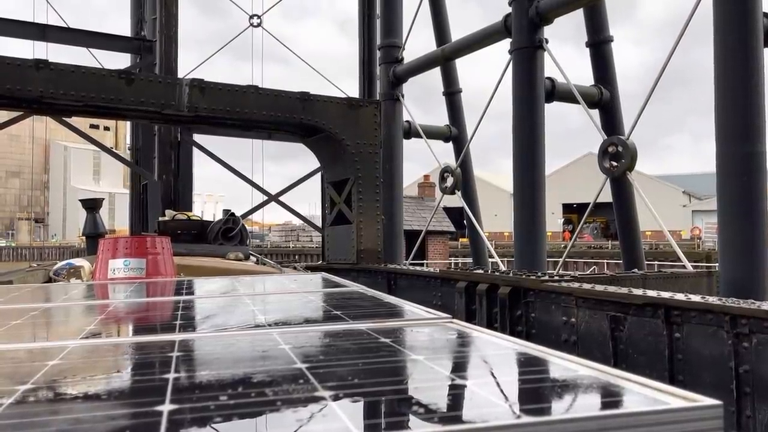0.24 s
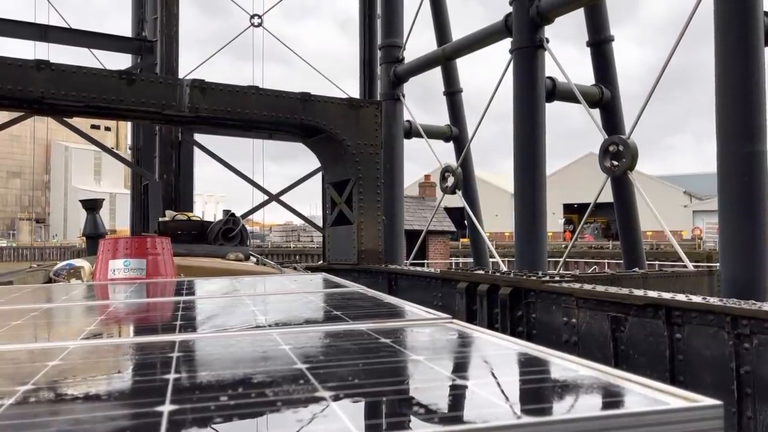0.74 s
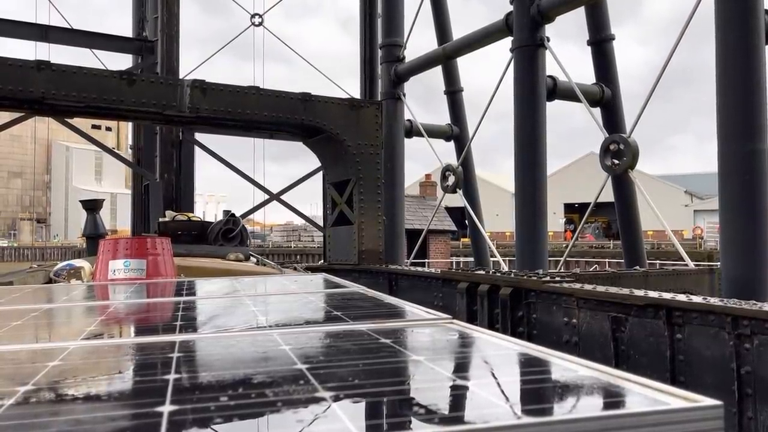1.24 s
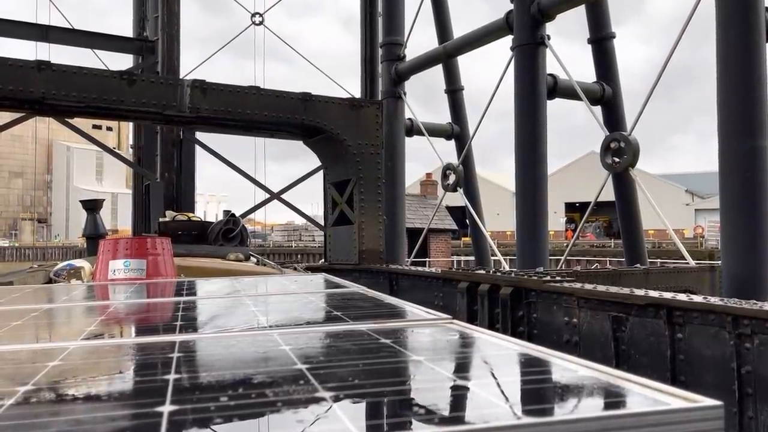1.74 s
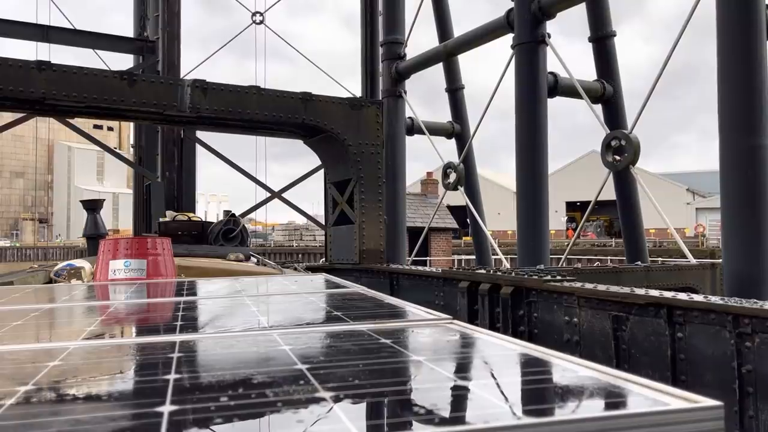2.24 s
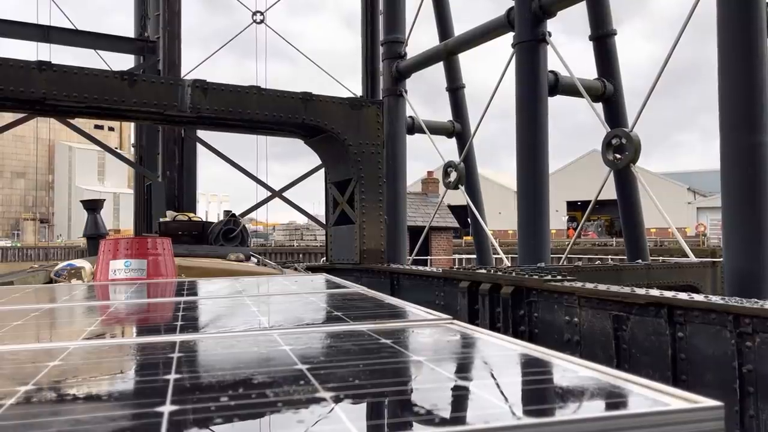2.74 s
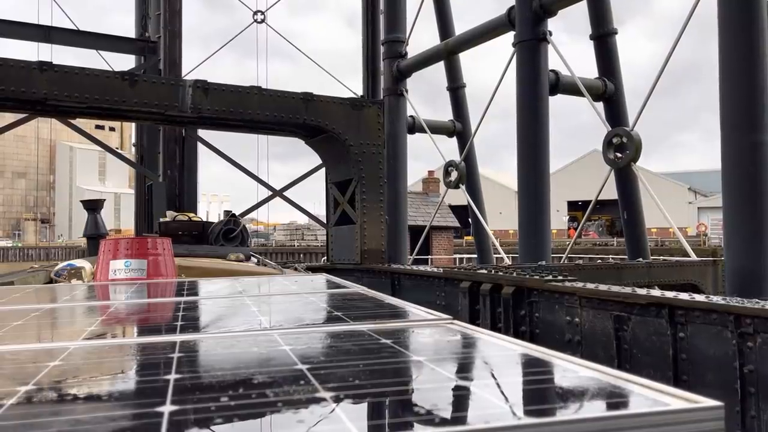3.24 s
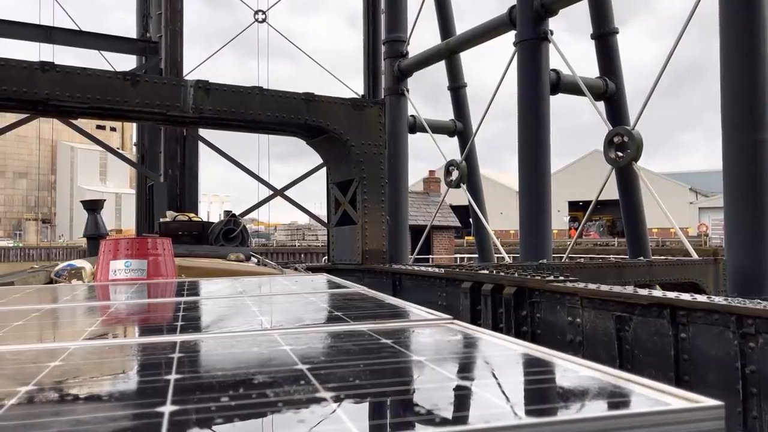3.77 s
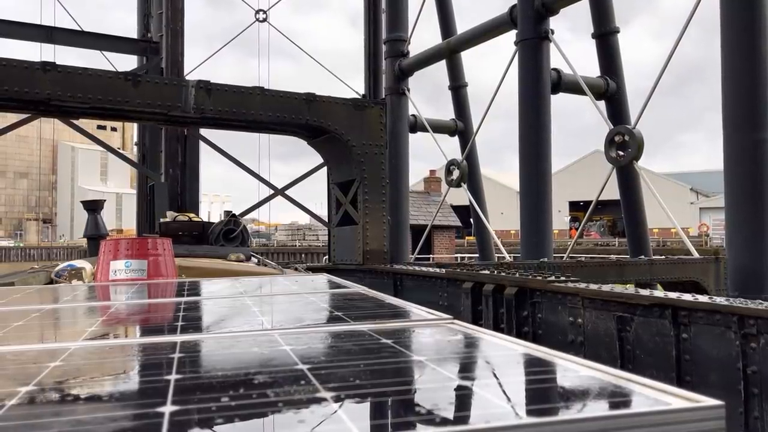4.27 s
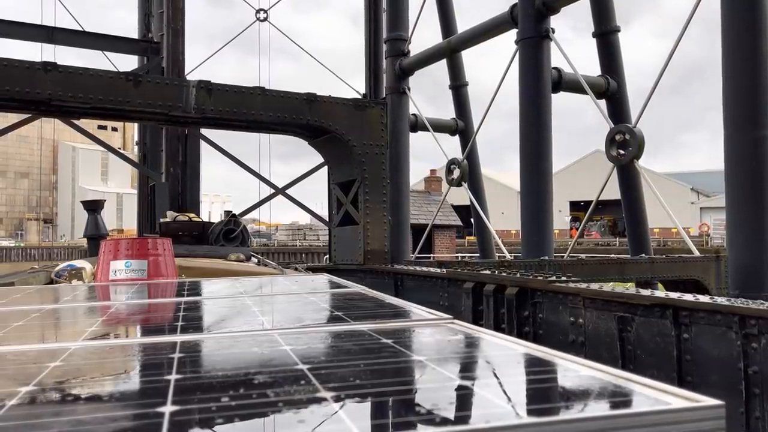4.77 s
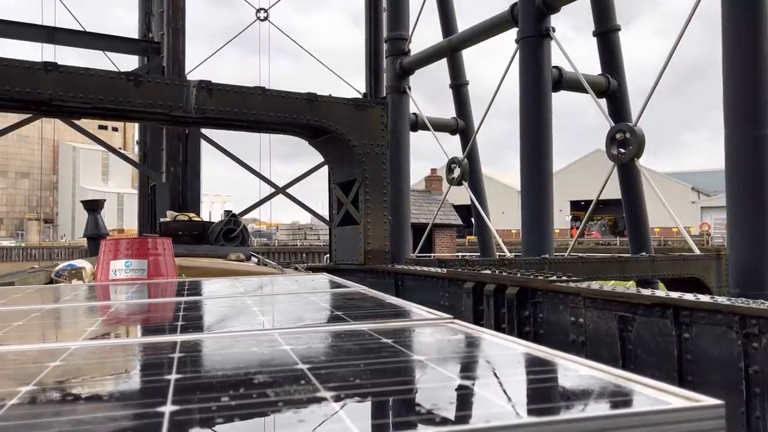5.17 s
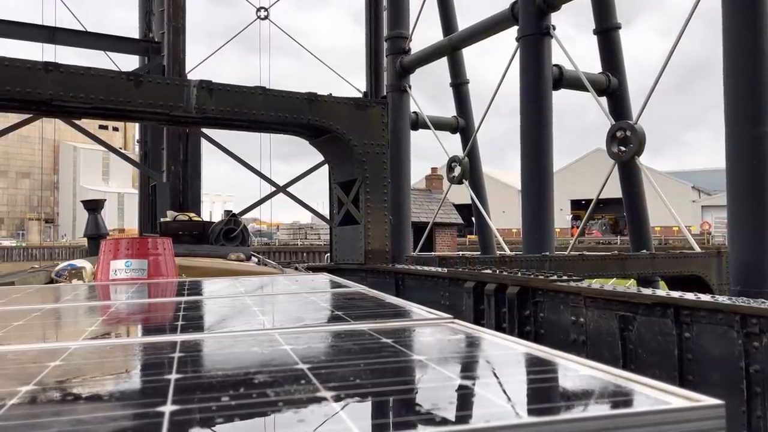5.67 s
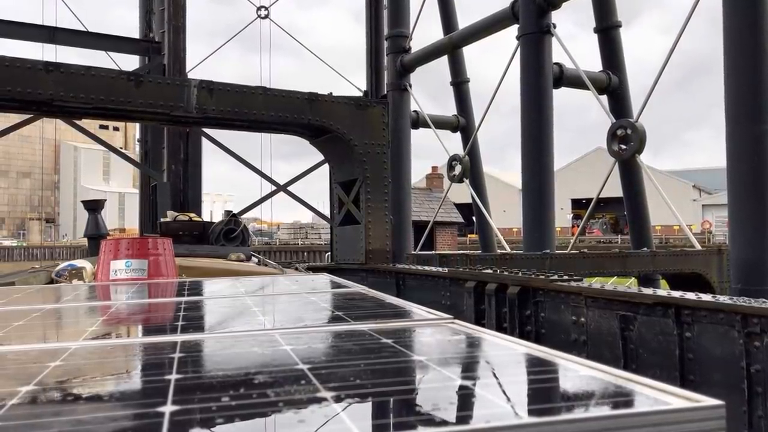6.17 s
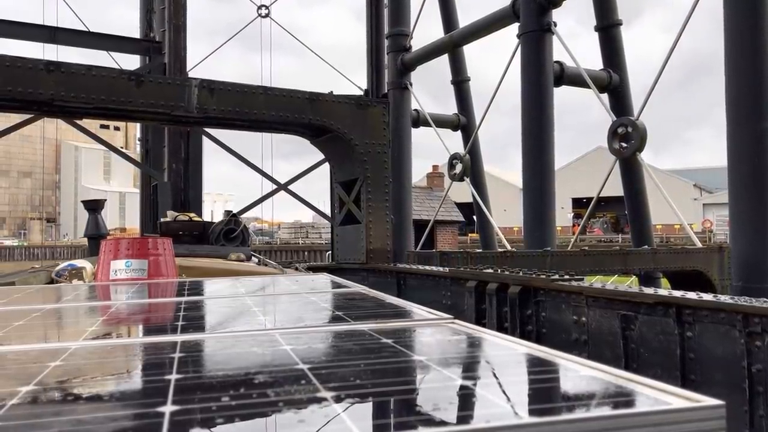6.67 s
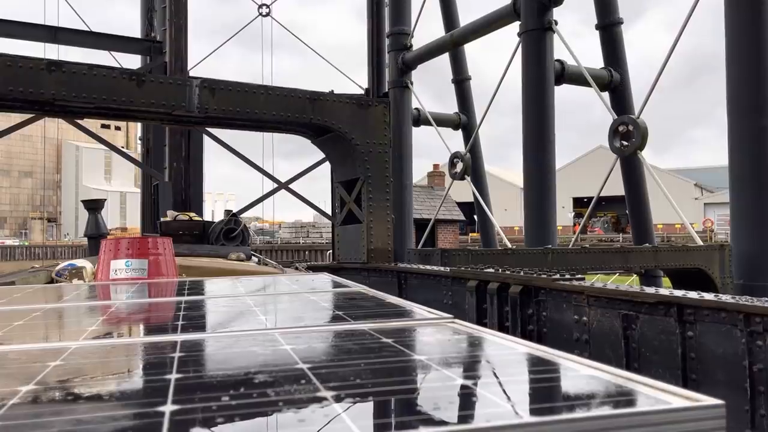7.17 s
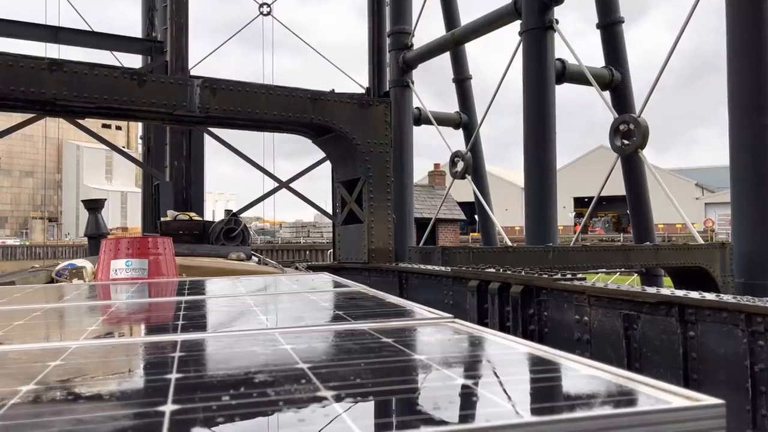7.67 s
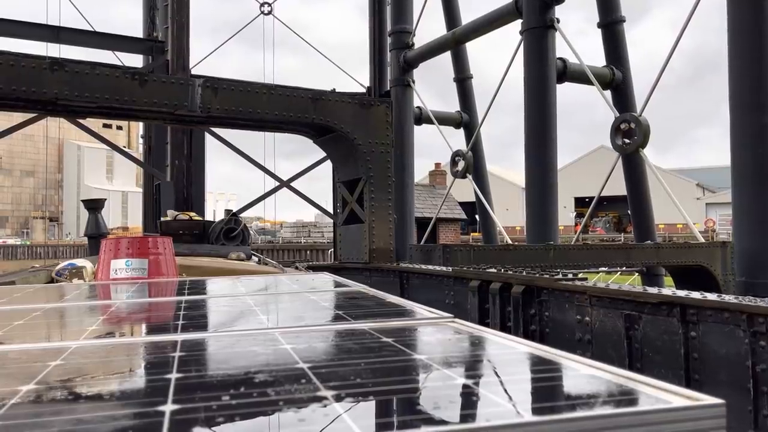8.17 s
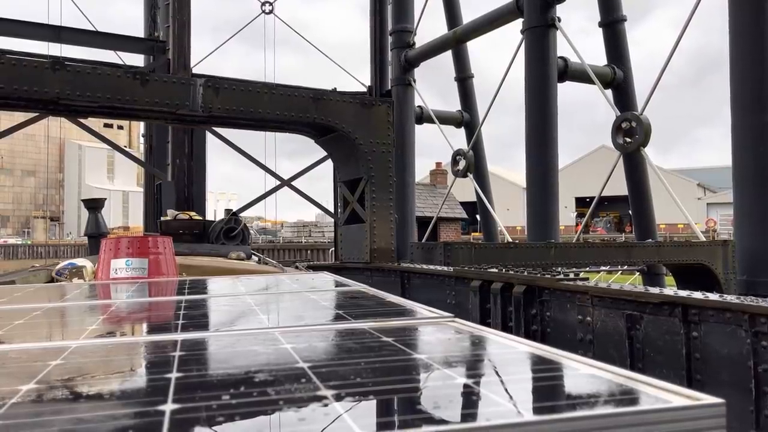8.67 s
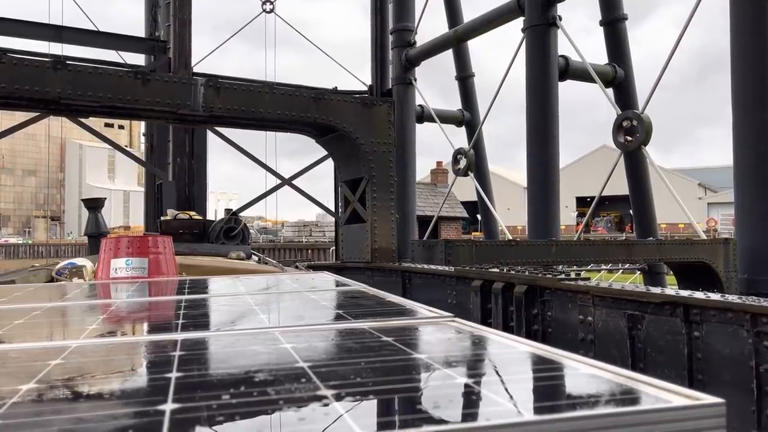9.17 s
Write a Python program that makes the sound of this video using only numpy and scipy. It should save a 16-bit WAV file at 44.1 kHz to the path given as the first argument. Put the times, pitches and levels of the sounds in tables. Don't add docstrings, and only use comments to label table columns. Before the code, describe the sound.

Outdoors at a large steel boat lift, heard through an exposed stereo phone microphone. Throughout, a drive holds one low pitch near 223 Hz, smooth and unwavering; its overtones swell and fade separately, drifting left and right as steelwork echoes pass. A continuous distant works roar, with soft hiss and faint airy top, sits behind. Wind puffs hit the microphone at 0 and 0.4 seconds, then a small popping flurry comes near 1.8. Low gusts thump around 2.1-2.8 and 3.8, with softer buffeting from 4.5 to 5.1. Stronger bumps arrive at 5.6 and 6.2. From 6.8 to 7.7 the hardest gusts burst in dense thuds, flutters and sharp pops. Faint, high bird chirps come from far left between 6.5 and 7.5, with one more near 8.4. The wind drops after 7.7, returning lightly around 9, while hum and roar continue to the end without a finish.

```python
import sys
import numpy as np
from scipy import signal
from scipy.fft import rfft, irfft, next_fast_len
from scipy.io import wavfile
from scipy.ndimage import uniform_filter1d

SR = 44100
rng = np.random.default_rng(int(sys.argv[2]) if len(sys.argv) > 2 else 0)


def convert_level_to_amplitude(level_db):
    exponent = np.asarray(level_db, float) / 20
    return 10 ** exponent


def wav_out(sig):
    wavfile.write(sys.argv[1], SR, np.round(np.clip(np.atleast_2d(sig).T, -1, 1) * 32767).astype(np.int16))


N = 415422
TIME = np.arange(N) / SR
SPAN = next_fast_len(N)
BINS_HZ = np.maximum(np.arange(SPAN // 2 + 1) * SR / SPAN, 1)

# pitch in Hz, level in dB per Hz, left minus
# right in dB, likeness of the ports 0-1, left lead in rad.
WORKS_COLOUR = [(60, -15, -6, .8, -6), (130, 2.5, -15, 0.7, 2.5), (252, 19.5, 2, 0.68, -1.4), (320, 14, 4, 0.5, -1),
                (430, 9, -4.5, 0.67, -0.5), (540, 7, -1.5, 0.13, 0), (640, 7.5, 1, 0.02, 0.74),
                (850, 6, -1.5, 0.39, -0.1), (1046, 4.5, 2, 0.35, 2.24), (1242, 5, 4, 0.6, -2),
                (1427, -1.5, -2, 0.25, -3), (2230, -4, 0, 0.25, 1.66), (2660, -6.5, 2.5, 1, 0.6),
                (2890, -7, 1.5, 0.35, 2),
                (3600, -10, 1.6, .52, .55), (4400, -13, 1.7, .5, .55), (5200, -13.2, 2.5, .25, .5),
        (5900, -13.2, 2.5, .57, .3), (6500, -15, 3, .55, .15), (7050, -14.7, 4.8, .52, .3),
        (7500, -13.3, 2.6, .7, .9), (8150, -12.2, 1, .86, .4),
                (8350, -12.2, 0, .998, 0), (8850, -12.6, 0, .998, -.04), (9050, -12, 0, .9, -.9),
       (9650, -12, 0, .9, -2.4), (9950, -12, 0, .996, -3.06), (10400, -12, 0, .999, -3.16),
       (10550, -11.8, 0, .88, -3.7), (11200, -16, 0, .8, -5.1), (11420, -19.5, 0, .995, -6.2),
       (11680, -25, 0, 1, -6.28), (12150, -33, 0, 1, -6.28), (12300, -110, 0, 1, -6.28)]

# start in seconds, length in seconds, start in Hz, end in Hz, level in dB.
CHIRPS = [(6.53, 0.052, 7200, 7100, -57), (6.58, .045, 7000, 6850, -55), (6.695, .06, 5400, 5270, -57),
          (6.765, .035, 5350, 5350, -56), (6.85, .035, 5350, 5300, -58), (7.01, .04, 7000, 7000, -58),
          (7.12, .035, 5100, 6100, -57), (7.285, .025, 5500, 5970, -53), (7.334, .025, 5800, 5600, -55),
          (7.47, .03, 5500, 5930, -60), (8.39, .06, 6150, 6100, -58)]

# pitch in Hz, level in dB per Hz.
THUD = [(18, -40), (30, -23), (42, -11.5), (60, -5.5), (85, -1.5), (120, -14), (300, -70), (2000, -130)]
RUMBLE = [(45, -62), (85, 1), (120, 2.5), (180, 1.5), (240, -2.5), (330, -29), (900, -86), (3000, -130)]
FLUTTER = [(120, -22), (200, 0.5), (330, -5), (450, -11), (620, -12), (900, -54), (2500, -90), (5000, -130)]
# colour, evened over seconds, likeness of the ports 0-1,
# tilt in dB per dB of brightness, gust level in dB, breeze level in dB, lumps in dB.
EDDIES = [
    (THUD, 0.07, 0.85, -0.55, -3.5, -3, 2.5),
    (RUMBLE, 0.05, 0.82, 0.45, -3.5, -1.5, 2.2),
    (FLUTTER, 0.05, 0.6, 0.3, -15, -9, 2.5),
]
# time in seconds, level in dB, brightness in dB.
BREEZE = [(0.0, -37, 2), (0.45, -37.5, 3), (0.75, -33, 4), (1.15, -38, 8.5), (1.7, -35.5, 9),
          (2.2, -33.5, 0.5), (4.1, -32.5, -1), (4.35, -35.5, 0), (5.4, -34.5, 2), (5.85, -36, 8),
          (6.35, -30.5, -6), (6.7, -32.5, -4), (6.95, -31.5, -1), (7.6, -26.5, 2.5), (7.8, -36.5, 5),
          (8.5, -38, 2), (8.9, -33, -7), (9.42, -33.5, 5)]
# peak in seconds, reach in seconds, peak level in dB, brightness in dB.
GUSTS = [(0.01, 0.069, -25.5, 6), (0.354, 0.042, -27.5, 9), (0.918, 0.026, -34, -6),
         (2.105, 0.069, -31.5, 3.2), (2.24, 0.027, -29, -1), (2.544, 0.045, -32, -3),
         (2.83, 0.065, -24, -5), (3.208, 0.043, -29, 1), (3.687, 0.03, -30, -5), (3.816, 0.041, -24, -7),
         (3.97, 0.075, -34, -7), (4.56, 0.19, -32, 2), (4.8, 0.077, -31, -8), (4.934, 0.054, -30, -15),
         (5.133, 0.045, -30, -8), (5.373, 0.037, -34, -9), (5.592, 0.11, -23, 2.5), (5.69, 0.022, -28, 11),
         (6.181, 0.021, -25, 9), (6.276, 0.043, -24.1, 5), (6.366, 0.033, -29, -4), (6.87, 0.042, -17, 2.5),
         (6.97, .03, -23, -5), (7.05, 0.057, -16, 2), (7.159, 0.024, -19, -5), (7.34, 0.072, -23, -5),
         (7.46, 0.036, -18.5, -1), (7.658, 0.035, -27, 3), (8.95, 0.18, -33, 1), (9.224, 0.038, -31, -6)]

# time
# in seconds, peak in dB, pitch in Hz.
POPS = [(0.02, -14.5, 278), (0.363, -20.5, 270), (1.739, -19, 217), (1.814, -13.5, 320), (1.874, -19, 268),
        (2.105, -19.5, 218), (5.491, -21, 216), (5.591, -12.5, 218), (5.611, -17, 248), (5.661, -16, 244),
        (5.696, -13.5, 243), (6.179, -15, 195), (6.268, -16.5, 218), (6.812, -7, 320), (6.848, -14, 220),
        (6.868, -10.5, 200), (6.894, -20, 219), (7.031, -11, 215), (7.059, -10, 250), (7.158, -15, 160),
        (7.328, -10.5, 234), (7.404, -9.5, 320), (7.426, -11.5, 463), (7.465, -13, 220), (7.516, -15, 200),
        (7.541, -12, 356), (7.565, -18, 248), (7.588, -12, 217), (7.644, -12, 280), (7.662, -12, 211),
        (.004, -13.5, 204), (1.81, -30, 480), (5.559, -26, 600), (5.589, -21, 640), (5.68, -26, 450),
         (6.267, -22, 540), (6.8093, -17, 520), (6.829, -17, 90), (6.955, -17, 100), (7.094, -14.5, 90),
         (7.399, -22, 520), (7.483, -22, 130), (7.643, -18, 640)]

# nearest in seconds, reach in seconds, left in dB, right in dB, left lead in rad.
FIRST = [
    (0, 3.7, -29, -27, -1.58),
    (4.2, 2.67, -33, -28.5, -1.86),
    (9.4, 3.14, -25.5, -30.5, -2.5),
]
SECOND = [
    (1.3, 2.0, -52.6, -58.0, -0.3),
    (3.7, 2.0, -46.1, -49.0, 2.8),
    (4.25, 0.36, -56.8, -45.8, 0.2),
    (6.28, 2.0, -44.7, -37.0, 2.4),
    (7.4, 0.53, -42.9, -59.3, -0.6),
    (9.32, 1.48, -46.1, -40.9, 0.6),
]
FOURTH = [
    (0.27, 0.59, -47.0, -52.2, -3.2),
    (1.14, 0.6, -46.5, -51.8, -1.1),
    (2.1, 0.59, -46.9, -48.9, 3.0),
    (3.5, 0.82, -51.7, -43.9, -2.3),
    (4.32, 0.29, -52.0, -56.8, -3.4),
    (4.76, 0.85, -59.5, -45.1, -2.0),
    (6.9, 1.7, -55.8, -60.3, 1.1),
    (8.27, 2.0, -74.0, -52.4, 5.2),
    (9.79, 0.82, -49.9, -46.5, 2.6),
]
FIFTH = [
    (0.16, 0.38, -47.3, -52.3, -0.5),
    (0.63, 0.32, -71.7, -51.2, -1.3),
    (1.63, 0.58, -46.7, -43.4, 0.5),
    (3.0, 0.6, -46.1, -53.1, 0.9),
    (3.29, 0.59, -45.3, -55.0, -4.6),
    (4.93, 0.59, -44.0, -45.3, -0.8),
    (5.71, 0.47, -46.1, -52.8, -0.9),
    (6.41, 0.58, -46.0, -50.6, 3.3),
    (7.83, 0.68, -53.0, -46.5, -0.9),
    (9.28, 0.59, -45.2, -51.0, 1.7),
]
# multiple of the drive pitch, level in dB, swell in seconds, reach in seconds, swell in dB.
FAINT = [
    (3, -58, 0, 1.5, 6),
    (6, -64, 9.2, 3, 5),
    (7, -64.5, 3.2, 1.2, 6),
    (8, -62, 7.2, 2, 6),
    (9, -71, 7.8, 2.5, 6),
]

DRIVE_HZ = 222.88
WHINE_HZ, WHINE_DB = 2522, -65
WORKS_DB = -37.5
LEFT_LATE_S = 0.00041
SMALL_POPS, SMALL_POP_DB, SMALL_POP_HZ = 120, 1, 257
BIRD_PAN_DB, BIRD_LEAD_RAD = 6, 1.4


def walk(rate):
    hold, count = int(1000 / rate), int(TIME[-1] * 1000) + 2
    steps = np.repeat(rng.standard_normal(count // hold + 1), hold)
    coarse = uniform_filter1d(uniform_filter1d(steps, hold), hold)[:count]
    return 1.3 * np.interp(TIME, np.arange(count) / 1000, coarse)


def over_time(table):
    s, *columns = np.transpose(table)
    return [np.interp(TIME, s, c) for c in columns]


def over_pitch(table):
    hz, *columns = np.transpose(table)
    return [np.interp(np.log(BINS_HZ), np.log(hz), c) for c in columns]


def hump(s, reach):
    return np.exp(-((TIME[::88, None] - s) / reach) ** 2)


def fine(coarse):
    return np.interp(TIME, TIME[::88], coarse)


def ports(x, db, pan_db, like, lead):
    shared, own = rfft(x, SPAN)
    like = np.clip(like, 0, 1)
    both = np.sqrt((1 + like) / 2) * shared
    apart = np.sqrt((1 - like) / 2) * own
    left = (both + apart) * convert_level_to_amplitude(db + pan_db / 2) * np.exp(0.5j * lead)
    right = (both - apart) * convert_level_to_amplitude(db - pan_db / 2) * np.exp(-0.5j * lead)
    out = irfft([left, right], SPAN)[:, :N]
    return out / np.sqrt(np.mean(out ** 2))


def works():
    noise = ports(rng.standard_normal((2, N)), *over_pitch(WORKS_COLOUR))
    spectrum, out = rfft(noise, SPAN), 0
    octave = np.log2(BINS_HZ / 100)
    for k in range(7):
        place = np.clip(octave, 0, 6) - k
        share = np.cos(np.pi / 2 * np.clip(place, -1, 1)) ** 2
        wander = convert_level_to_amplitude(0.21 * walk(0.74) + 0.97 * walk(5))
        out = out + irfft(spectrum * share, SPAN)[:, :N] * wander
    return convert_level_to_amplitude(WORKS_DB) * out


def bird():
    out = np.zeros((2, N))
    lead = np.array([[BIRD_LEAD_RAD], [0]])
    pan_db = np.array([[BIRD_PAN_DB], [-BIRD_PAN_DB]]) / 2
    for s, length, from_hz, to_hz, db in CHIRPS:
        n, at = int(length * SR), int(s * SR)
        warble = 40 * uniform_filter1d(rng.standard_normal(n), size=8)
        hz = np.linspace(from_hz, to_hz, n) + warble
        note = np.sin(2 * np.pi * np.cumsum(hz) / SR + lead) * np.hanning(n) ** 0.5
        out[:, at:at + n] += note * convert_level_to_amplitude(db + pan_db)
    return out


def blowing(tilt, gust_db, breeze_db):
    s, reach, db, bright_db = np.transpose(GUSTS)
    gusts = fine(hump(s, reach) ** 2 @ convert_level_to_amplitude(db + gust_db + tilt * bright_db) ** 2)
    db, bright_db = over_time(BREEZE)
    breeze = convert_level_to_amplitude(db + breeze_db + tilt * bright_db) ** 2
    return np.sqrt(gusts + breeze)


def wind():
    out = 0
    for shape, even_s, like, tilt, gust_db, breeze_db, lumps_db in EDDIES:
        eddies = rng.standard_normal((2, N)) * convert_level_to_amplitude(2.6 * walk(60))
        swirl = ports(eddies, over_pitch(shape)[0], 0, like, -2 * np.pi * BINS_HZ * LEFT_LATE_S)
        even = int(even_s * SR)
        power = np.mean(swirl ** 2, axis=0)
        strength = np.sqrt(uniform_filter1d(uniform_filter1d(power, even), even))
        out = out + blowing(tilt, gust_db, breeze_db + lumps_db * walk(14)) * swirl / strength
    return out


def pops():
    out = np.zeros((2, N))
    when, size, pitch = rng.random((SMALL_POPS, 3)).T
    wind_db = 20 * np.log10(blowing(0.17, 0, 0)[(when * (N - 1)).astype(int)])
    small_db = wind_db + SMALL_POP_DB + 6 * (size - 0.5)
    small_hz = SMALL_POP_HZ * 2 ** (0.9 * (pitch - 0.5))
    bursts = POPS + list(zip(when * TIME[-1], small_db, small_hz))
    chance = rng.random((len(bursts), 2))
    for (s, db, hz), (start, lean) in zip(bursts, chance):
        at = slice(max(int((s - 0.03) * SR), 0), int((s + 0.04) * SR))
        for side, late_s in enumerate((LEFT_LATE_S * (0.6 + 0.72 * lean), 0)):
            turns = (TIME[at] - s - late_s) * hz
            shape = np.exp(-(turns / np.where(turns < 0, 0.6, 0.9)) ** 2)
            swing = np.sin(2 * np.pi * (turns - 0.16 * turns ** 2 + 0.18 * (start - 0.5)))
            out[side, at] += convert_level_to_amplitude(db - 0.5) * shape * swing
    return out


def drive():
    out = 0
    turn = 2 * np.pi * DRIVE_HZ * TIME
    for multiple, table in zip((1, 2, 4, 5), (FIRST, SECOND, FOURTH, FIFTH)):
        s, reach, left_db, right_db, lead = np.transpose(table)
        echoes = hump(s, reach)
        left = fine(echoes @ (convert_level_to_amplitude(left_db) * np.exp(0.5j * lead)))
        right = fine(echoes @ (convert_level_to_amplitude(right_db) * np.exp(-0.5j * lead)))
        tone = convert_level_to_amplitude(0.15 * multiple * walk(13)) * np.exp(1j * multiple * (turn + 0.033 * walk(9.1)))
        out = out + np.imag(np.array([left, right]) * tone)
    for multiple, db, s, reach, swell_db in FAINT:
        db = db + swell_db * fine(hump(s, reach)[:, 0])
        paths = []
        for _ in "lr":
            level = convert_level_to_amplitude(db - 3 + 2.5 * walk(6))
            paths.append(level * np.sin(multiple * turn + 1.5 * walk(1) + 0.25 * walk(15)))
        out = out + np.array(paths)
    whine_turn = 2 * np.pi * WHINE_HZ * TIME + 2 * walk(4) + 0.5 * walk(25)
    whine = convert_level_to_amplitude(WHINE_DB - 2 + 2.5 * walk(7)) * np.sin(whine_turn)
    return np.sqrt(2) * (out + whine)


def scene():
    return works() + bird() + wind() + pops() + drive()


def low_pass(x):
    return signal.sosfilt(signal.butter(12, 12190, fs=SR, output="sos"), x)


def record(dry):
    rounded = np.tanh(1.119 * dry) / 1.083
    return low_pass(rounded)


dry = scene()
out = record(dry)
wav_out(out)
```